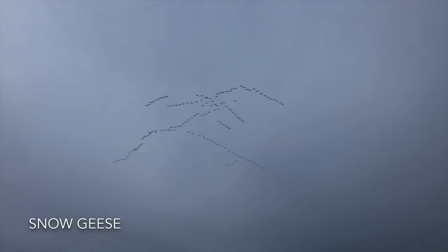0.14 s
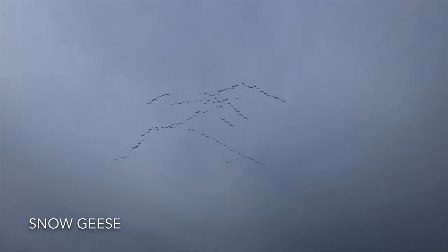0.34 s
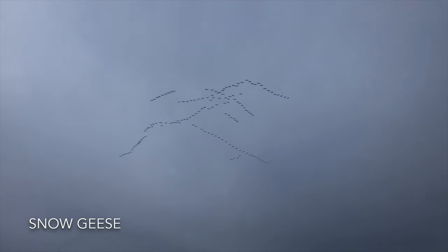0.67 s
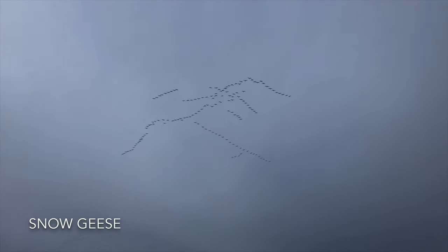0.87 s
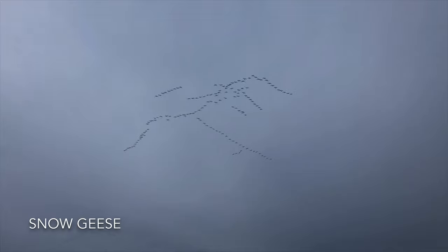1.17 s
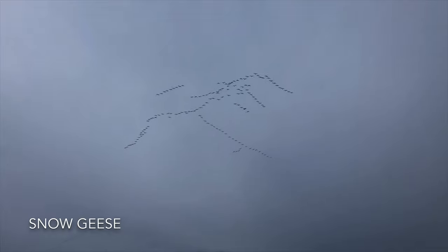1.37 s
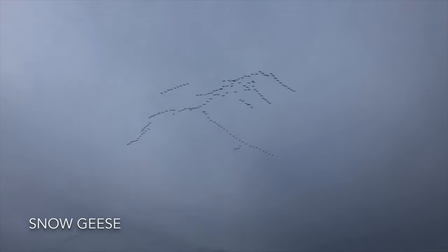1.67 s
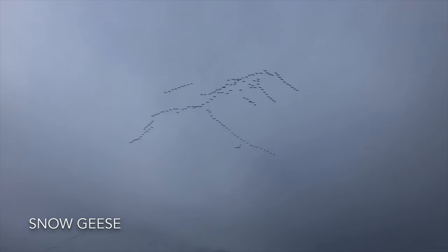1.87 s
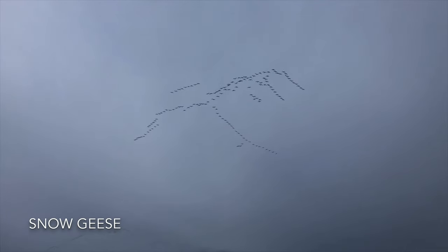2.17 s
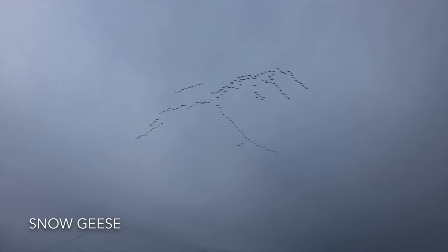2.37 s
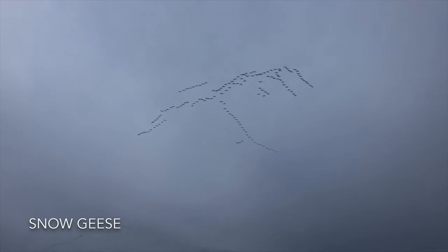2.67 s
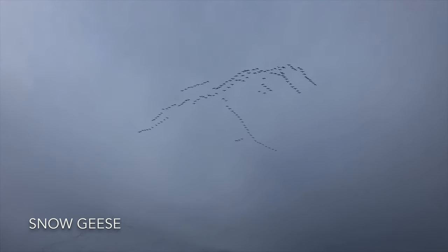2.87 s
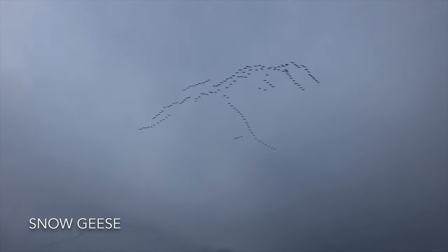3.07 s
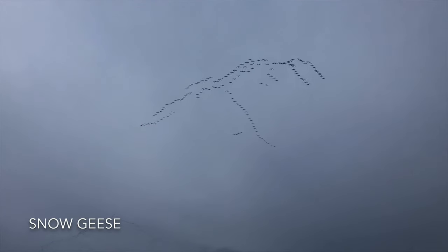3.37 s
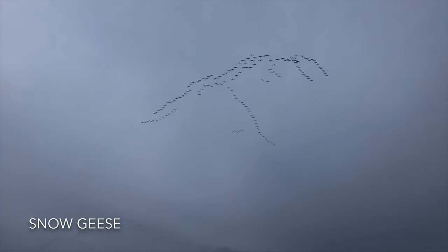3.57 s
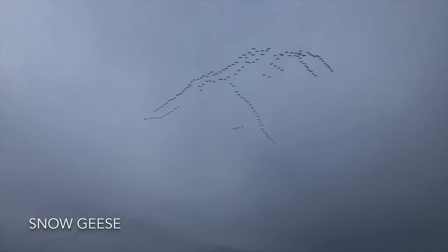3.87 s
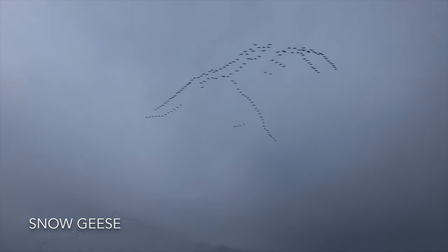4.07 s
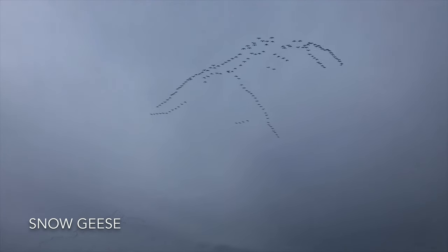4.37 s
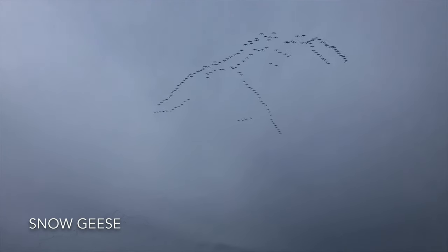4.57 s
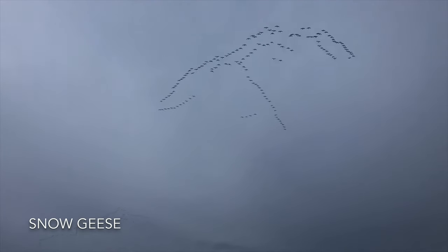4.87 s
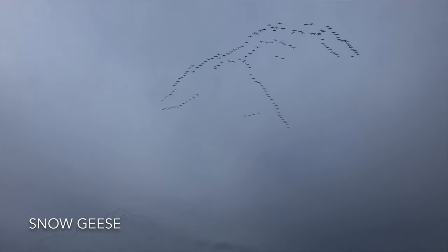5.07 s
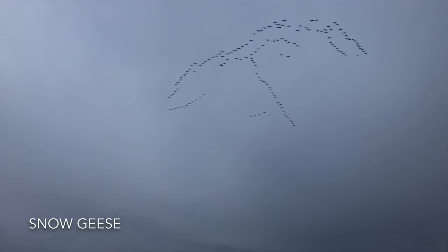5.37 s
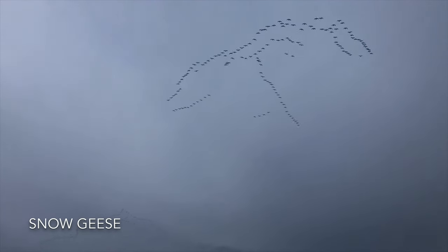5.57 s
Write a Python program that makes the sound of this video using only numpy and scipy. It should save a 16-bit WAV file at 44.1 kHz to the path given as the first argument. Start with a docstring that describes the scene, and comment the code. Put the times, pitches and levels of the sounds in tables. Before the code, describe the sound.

Gusty wind rumbles and pops against a microphone while a high, distant flock of geese gives short overlapping honks overhead.

```python
"""Geese pass high overhead while gusty wind buffets a single microphone.
From the start there is a low wind rumble with fluttering turbulence and faint hiss; far birds blur into a murmur.
Almost at once short arched honks begin and overlap, built from overtones and breath noise.
Some are hoarse, some drop to a low buzzing grunt.
From about 0.2 s eddies pop with a falling pitch, most strongly near 4.7 s."""
import sys
import numpy as np
from scipy import signal
from scipy.fft import rfft, irfft, next_fast_len
from scipy.io import wavfile
from scipy.ndimage import uniform_filter1d, minimum_filter1d, map_coordinates

SR = 44100
rng = np.random.default_rng(int(sys.argv[2]) if len(sys.argv) > 2 else 0)


def wav_record(signal):
    """Record a signal, one row per channel, as 16-bit PCM in the file named by sys.argv[1]."""
    frames = np.transpose(np.atleast_2d(signal))
    bounded = np.clip(frames, -1, 1)
    # unit amplitude maps onto the largest positive 16-bit level
    quanta = np.round(bounded * 32767).astype(np.int16)
    wavfile.write(sys.argv[1], SR, quanta)


N = 252693


def amp(db):
    """Turn decibels into an amplitude factor."""
    return 10 ** (np.asarray(db) / 20)


def unit(x):
    """Scale a sound to an average strength (rms) of 1."""
    return x / np.sqrt(np.mean(x ** 2) + 1e-20)


def along(points, hz):
    """Read a (f/Hz, level/dB) curve on a log frequency axis; outside it the level is -120 dB."""
    f, level_db = np.transpose(points)
    return np.interp(np.log(hz + 1), np.log(f + 1), level_db, left=-120, right=-120)


def wobble(rate, size=N):
    """A smooth random curve with the given number of random knots a second."""
    knots = rng.standard_normal(int(size * rate / SR) + 4)
    return map_coordinates(knots, [np.arange(size) * rate / SR])


def filtered(x, response):
    """Multiply the spectrum of x by a response that depends on frequency."""
    m = next_fast_len(len(x) + 8192)
    hz = np.fft.rfftfreq(m, 1 / SR)
    return irfft(rfft(x, m) * response(hz), m)[:len(x)]


def noise(spectrum, size=N):
    """Random hiss shaped by a spectrum, with rms 1."""
    white = rng.standard_normal(size)
    return unit(filtered(white, lambda hz: amp(along(spectrum, hz))))


def gusts():
    """Wind strength rises and falls in straight lines in dB between the listed moments."""
    # how hard the wind presses on the microphone: t/s, relative level/dB
    gust_points = [(0.0, -18.5), (0.05, -22), (0.17, -35), (0.44, -18.5), (0.859, -38.5), (1.019, -20.5),
                   (1.531, -18), (1.759, -35), (2.121, -35.5), (2.17, -21.5), (2.292, -24), (2.32, -39.5),
                   (2.55, -32.5), (2.891, -23.5), (3.25, -17.5), (3.43, -21), (3.558, -14.5), (3.67, -29),
                   (4.039, -27.5), (4.08, -33.5), (4.2, -27), (4.79, -12), (4.86, -20), (4.99, -18),
                   (5.3, -33.5), (5.46, -38.5), (5.55, -24), (5.63, -44), (5.73, -41.5)]
    s, db = np.transpose(gust_points)
    return np.interp(np.arange(N) / SR, s, db)


def wind_rumble(gust_db, puff, shared):
    """Low noise follows the gusts, with random lumps, and swells with each burst of eddies."""
    # tone of the rumble: f/Hz, relative level/dB per Hz
    rumble_tone = [(15, -45.5), (30, -21.5), (50, -2.5), (80, 1), (140, -4), (220, -10), (500, -33)]
    shove_db, shove_s = -6.5, 0.018
    lumps = amp(1.5 * wobble(14) + 2 * shared)
    rumble = unit(lumps * noise(rumble_tone))
    shove = amp(shove_db) * np.abs(uniform_filter1d(puff, int(shove_s * SR)))
    return (amp(gust_db - 0.5) + shove) * rumble


def wind_hiss(gust_db, puff):
    """A steady faint noise, plus more of it when the wind pushes harder."""
    # tone of the hiss: f/Hz, relative level/dB per Hz
    hiss_tone = [(1000, -0.5), (4000, 1), (8000, -3.5), (16000, -12)]
    push = uniform_filter1d(amp(gust_db) + puff, SR // 20)
    return (amp(-77.0) + amp(-60.5) * push) * noise(hiss_tone)


def churn(strength, lumps_db):
    """Turbulent noise of a given strength; the capsule dulls it however sudden it is."""
    # tone of the turbulence: f/Hz, relative level/dB per Hz
    flutter_tone = [(100, -17), (220, -0.5), (400, -6.5), (800, -19.5), (1400, -33.5), (3000, -59.5),
                    (5000, -70.5)]

    def colour(hz):
        return amp(along(flutter_tone, hz))

    white = unit(amp(lumps_db) * rng.standard_normal(N))
    return filtered(strength * white, colour) / np.std(filtered(white, colour))


def eddies(s, db, start_hz, phase):
    """Each eddy is a brief pressure wave whose pitch slides down as it spreads over the capsule."""
    t = np.arange(SR // 30) / SR
    slide_s, low_hz, life_s = .0024, 170, .0045
    start_hz = start_hz[:, None]
    turns = low_hz * t + (start_hz - low_hz) * slide_s * (1 - np.exp(-t / slide_s))
    shape = (1 - np.exp(-t * start_hz / 1.8)) ** 2 * np.exp(-t / life_s)  # high ones rise faster
    shape = shape / shape.max(axis=1, keepdims=True)
    waves = amp(db)[:, None] * shape * np.sin(2 * np.pi * (turns + phase[:, None]))
    at = np.round(s * SR).astype(int)[:, None] + np.arange(len(t))
    return np.bincount(at.ravel(), waves.ravel(), N + SR)[:N]  # add all the waves in place


def wind_flutter(gust_db, shared):
    """Turbulence and 800 small eddies grow faster than the rumble, so strong gusts are brighter."""
    lumps = churn(np.ones(N), 4.2 * wobble(40) + 5 * shared)
    when, size, pitch, phase = rng.random((800, 4)).T
    small_db = -4 * np.log(size + 0.022)  # a few are much stronger than the rest
    small = unit(eddies(when * N / SR, small_db, 400 * np.exp(1.1 * pitch), phase))
    return amp(-33 + 1.333 * (gust_db + 22.0)) * (lumps + amp(-1.5) * small)


def far_murmur():
    """Far birds blur together into shaped noise whose level slowly wanders."""
    # tone of the murmur: f/Hz, relative level/dB per Hz
    murmur_tone = [(500, -14.5), (900, 0.5), (1250, -11.5), (1750, -9.5), (2200, -18.5), (3000, -22.5),
                   (5000, -36)]
    return amp(-57.0 + 0.85 * wobble(3.99)) * noise(murmur_tone)


def honk(length, top_hz, place, bright_db, hoarse):
    """A stack of overtones on an arched pitch, with breath noise; hoarse birds waver and rasp."""
    # how the throat passes each pitch: f/Hz, level/dB
    throat = [(450, -20), (900, -4), (1350, 2), (1800, 1.5), (2200, -9.5), (2500, -22.5), (2800, -19),
              (3400, -31)]
    # what a bird facing down adds: f/Hz, level/dB
    bill = [(2800, -28.5), (3600, 1.5), (4600, -0.5), (5300, -6), (6200, -22.5)]
    register_hz = 600  # calls above this are high, the others low grunts
    pointed = 1.5  # power of the arch's flanks: 2 is round, 1 is straight
    rise_sag, fall_sag, low_sag = 0.092, 0.21, 0.053  # share of the top pitch lost along a full flank
    scoop, scoop_s = 0.06, 0.007  # a high call slides up into its arch: share of pitch, time constant
    effort_db = 2  # how much weaker a call is at the far end of its arch than at the top

    n = int(length * SR)
    u = np.linspace(-1, 1, n)  # runs from the start of the call to its end
    hoarse = np.clip(hoarse, 0, 1)
    high = top_hz > register_hz

    # pitch
    top = 2 * np.clip(place, 0, 1) - 1
    away = np.abs((u - top) / (1 + abs(top))) ** pointed  # distance from the top of the arch
    sag = np.where(u < top, rise_sag, fall_sag) if high else low_sag
    arch = top_hz * (1 - away * sag)
    arch = arch * (1 - high * scoop * np.exp(-np.arange(n) / (scoop_s * SR)))
    pitch = arch * (1 + .011 * wobble(30, size=n) + .045 * hoarse * wobble(200, size=n))

    # overtones come and go, the upper ones most
    k = np.arange(1, 6000 // top_hz + 2)[:, None]
    hz = k * pitch
    flicker = amp([wobble(25, size=n) for _ in k])
    # low grunts bring out only a few overtones
    uneven = (1.5 + 3 * hoarse) * np.sqrt(max(1, register_hz / top_hz))
    throat_gain = amp(along(throat, hz)) * flicker ** uneven
    bill_gain = amp(bright_db + along(bill, hz)) * flicker ** 3
    turns = np.cumsum(hz, axis=1) / SR + rng.random(k.shape)
    voice = np.sum((throat_gain + bill_gain) * np.sin(2 * np.pi * turns), axis=0)

    # noise in the voice, then the rise and fall of the whole call
    swell = np.clip(1 - u ** 4, 0, 1)
    breath = (0.11 + 1.4 * hoarse) * noise(throat, size=n)
    rasp = (0.3 + 3 * hoarse) * amp(bright_db) * noise(bill, size=n)
    rasp = rasp * np.sqrt(swell) * amp(2.2 * wobble(66, size=n))
    return swell * amp(-effort_db * away) * (np.sqrt(2) * voice + breath + rasp)


def near_geese():
    """Clear honks placed in time, each followed by a little scattered sound that dies away quickly."""
    # calls, the length stretched below: t/s, length/s, top pitch f/Hz, place of the top in the call/0-1,
    # relative level/dB, brightness/dB, hoarseness/0-1
    calls = [(0.009, 0.057, 931, 1, -53, -24, 0.28), (0.06, 0.045, 887, 0.91, -50.5, -25.5, 0.33),
             (0.091, 0.05116, 454.4, 0.78, -51, -29, 0.07), (0.119, 0.083, 934, .25, -52, -29, 0.02),
             (0.451, .064, 957, .55, -49, -27, 0.1), (0.497, 0.054, 860, 0.6, -53, -22, 0),
             (0.559, 0.032, 910, 0.09, -63, -12, 0.48), (0.658, 0.11, 955, 0.58, -65.5, -40, 0.06),
             (0.828, 0.039, 444, 0.4, -58, -32, 0.25), (0.859, 0.077, 1027, 0.5, -54.5, -29, 0.55),
             (1.196, 0.052, 947, 0.9, -52, -18, 0.54), (1.245, 0.07, 866, 0.6, -53.5, -18.5, 0.35),
             (1.376, 0.082, 907.4, 0.88, -56, -34, 0), (1.594, 0.072, 970, 0.7, -59, -35, 0),
             (1.685, .055, 450, .5, -53.5, -41, 0), (1.651, 0.15, 932, 0.58, -54.5, -44.5, 0.17),
             (1.771, 0.054, 301.1, 0.49, -59, -35, 0.42), (1.824, 0.075, 284.2, 0.08, -61.5, -40, 0.4),
             (1.933, 0.054, 937, 0.65, -56, -21, 0.35), (1.972, 0.092, 864, 0.5, -52.5, -26, 0.03),
             (2.061, 0.13, 951, 0.7, -58, -36, 0.3), (2.34, 0.15, 897, 0.55, -52.5, -35, 0.02),
             (2.533, .16, 950, 0.58, -52, -38, 0.11), (2.714, 0.06, 945, 0.85, -53, -17, 0.8),
             (2.756, 0.081, 868.5, 0.51, -48, -17.5, 0.13), (3.399, 0.2, 959, 0.6, -57.5, -38, 0.25),
             (3.65, .12, 955, 1, -49, -39, 0.23), (3.701, 0.045, 905, 1, -49, -15, 0.1),
             (3.752, 0.04, 939.5, 0.1, -51, -18, 0.13), (3.756, .045, 1137, 0.4, -52, -20, 0.6),
             (3.789, .03, 875, 0.9, -47.5, -29, 0.1), (3.826, 0.083, 810.5, 0.6, -53.5, -34, 0.47),
             (3.797, .12, 177.2, .55, -57.5, -22, 0.2), (3.962, 0.175, 955.4, 0.6, -52.5, -33, 0.08),
             (4.025, 0.078, 898, 0.04, -52.5, -43, 0.11), (4.13, 0.1, 853.3, 0.6, -54, -36, 0.2),
             (4.336, 0.078, 858, 0.7, -55, -27, 0.28), (4.306, 0.1, 948, 0.5, -56.5, -35.5, 0.15),
             (4.454, 0.1, 1027, 0.6, -59, -35.5, 0.2), (4.782, .11, 915, 0.9, -60.5, -35.5, 0.08),
             (4.915, 0.072, 957, 0.7, -63.5, -34, 0.03), (5.003, 0.11, 960, 0.42, -60.5, -38, 0),
             (5.384, .1, 859, 0.6, -54, -43, 0.17), (5.486, 0.11, 924, 0.54, -59.5, -38, 0),
             (5.557, 0.11, 834.3, 0.51, -56, -28, 0)]
    near = np.zeros(N + SR)
    for s, length, top_hz, place, db, bright_db, hoarse in calls:
        call = honk(length * 1.16, top_hz, place, bright_db, hoarse)
        start = round((s - length * .08) * SR)  # the stretch is shared by both ends
        near[start:][:len(call)] += amp(db) * call
    t = np.arange(SR // 4) / SR
    scatter = rng.standard_normal(len(t)) * amp(-60 * t / 0.029)  # falls 60 dB in 29 ms
    echo = signal.fftconvolve(near, scatter / np.linalg.norm(scatter))[:N]
    return near[:N] + amp(-8.0) * echo


def bursts():
    """Each burst is one eddy with weaker ones behind it, in a puff of turbulence; strong ones start higher."""
    # bursts of eddies: t/s, level of the leading eddy before a 0.5 dB lift/dB
    pop_points = [(0.21, -22.5), (0.416, -12), (0.517, -26), (1.238, -18.5), (1.414, -17.5), (1.431, -13),
                  (1.457, -17.5), (1.494, -12.5), (2.153, -22.5), (2.197, -23), (2.843, -20.5),
                  (2.885, -19), (2.936, -19), (3.015, -15.5), (3.051, -21.5), (3.215, -11.5), (3.229, -17),
                  (3.252, -19), (3.283, -19), (3.319, -15.5), (3.346, -17), (3.499, -19.5), (3.526, -16),
                  (3.537, -10), (3.574, -18), (4.209, -25), (4.33, -18), (4.492, -14.5), (4.551, -18),
                  (4.565, -12), (4.576, -14), (4.618, -16), (4.638, -14), (4.661, -14), (4.723, -5),
                  (4.731, -3.5), (4.739, -8), (4.749, -2.5), (4.777, -14.5), (4.829, -17), (5.079, -24),
                  (5.54, -23.5)]
    s, db = np.array(pop_points).T[:, :, None]
    late, size, pitch, phase = rng.random((len(s), 4, 3)).transpose(1, 0, 2)
    late[:, 0], size[:, 0], pitch[:, 0] = 0, -.5, .7  # the leading eddy of each three
    start_hz = 1000 * amp(0.409 * (db + 19.5)) * np.exp(.6 * (pitch - .6))
    settings = (s + .016 * late, db - 4.5 - 10 * size, start_hz, phase)
    train = eddies(*(v.ravel() for v in settings))

    # every burst starts a puff that rises to its peak in 6.1 ms and dies away
    kicks = np.bincount(np.round(s[:, 0] * SR).astype(int), amp(db[:, 0]), N)
    u = np.arange(SR // 10) / SR / 0.0061
    puff = np.abs(signal.fftconvolve(kicks, u * np.exp(1 - u))[:N])
    return train + amp(-3.5) * churn(puff, 5.9 * wobble(120)), puff


def scene():
    """Wind and geese add up at one microphone; the layers of wind share their gusts and puffs."""
    gust_db = gusts()
    shared = wobble(16)  # lumps common to rumble and flutter
    pops, puff = bursts()
    wind = wind_rumble(gust_db, puff, shared) + wind_hiss(gust_db, puff)
    wind = wind + wind_flutter(gust_db, shared) + pops
    geese = far_murmur() + near_geese()
    return (wind + geese)[None]


def record(dry):
    """A limiter turns the strongest peaks down smoothly; nothing is kept above the band limit."""
    top_hz = 15760
    span = SR // 50  # the limiter looks over 20 ms
    need = np.minimum(1, .9 / (np.abs(dry[0]) + 1e-9))
    gain = uniform_filter1d(minimum_filter1d(need, span), span)
    fade_in = np.minimum(1, np.arange(N) / (.004 * SR))  # 4 ms
    held = np.pad(gain * dry[0] * fade_in, span, "reflect")  # padding keeps the filter clean at the ends
    return filtered(held, lambda hz: hz < top_hz)[None, span:-span]


dry = scene()
out = record(dry)
wav_record(out)
```